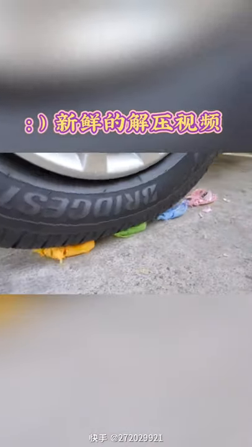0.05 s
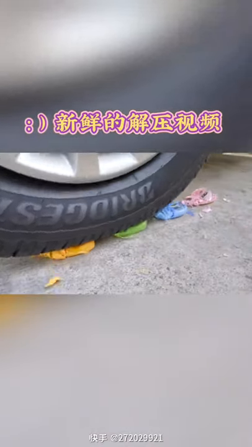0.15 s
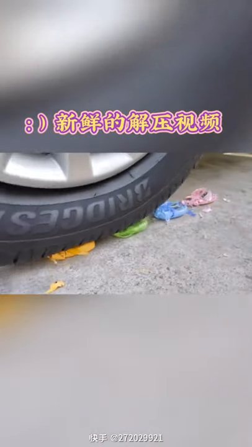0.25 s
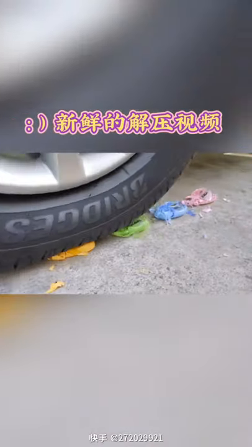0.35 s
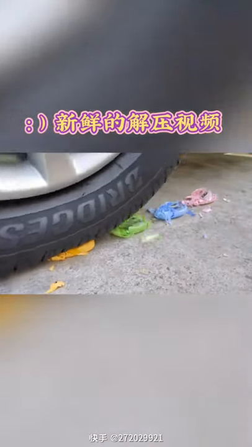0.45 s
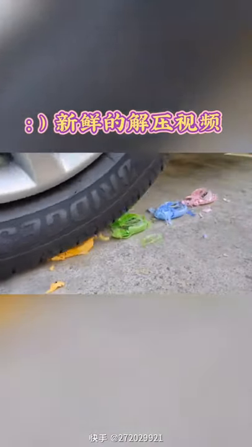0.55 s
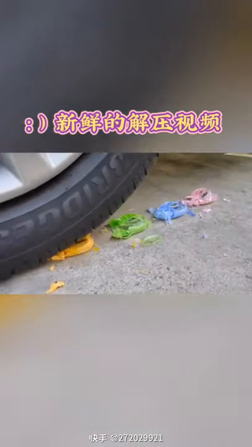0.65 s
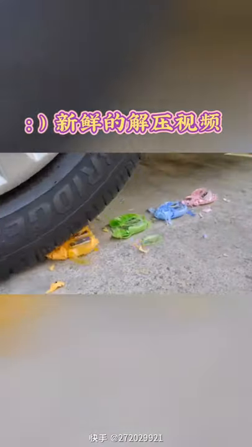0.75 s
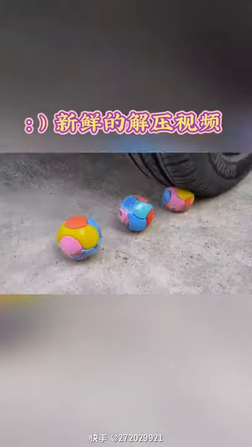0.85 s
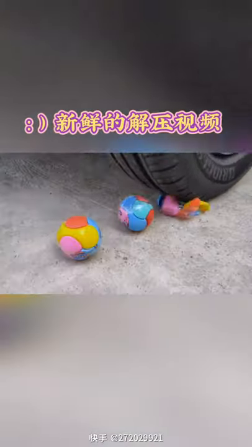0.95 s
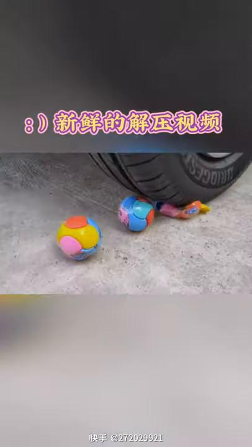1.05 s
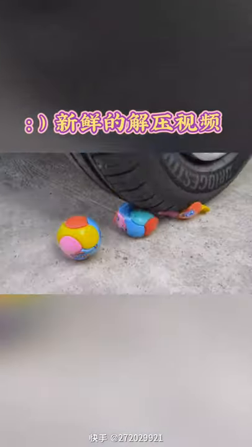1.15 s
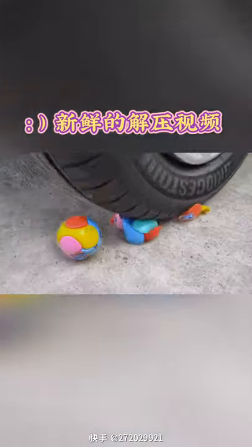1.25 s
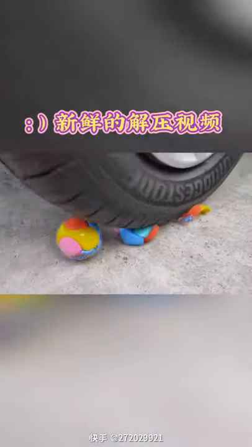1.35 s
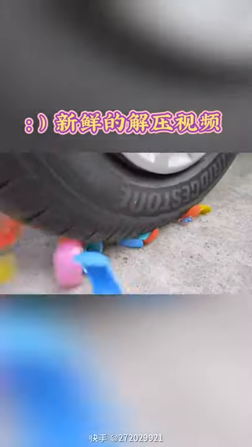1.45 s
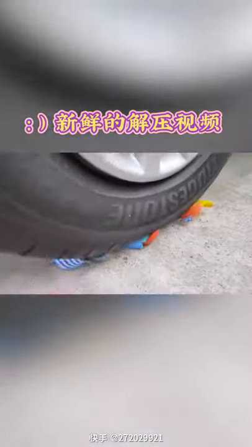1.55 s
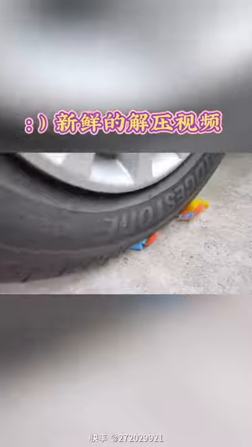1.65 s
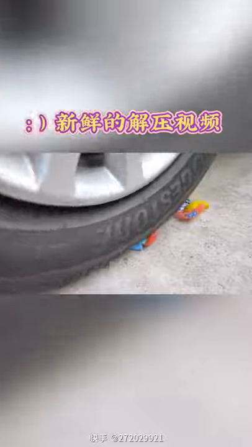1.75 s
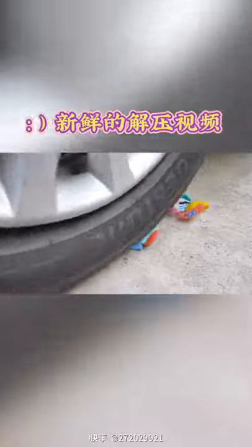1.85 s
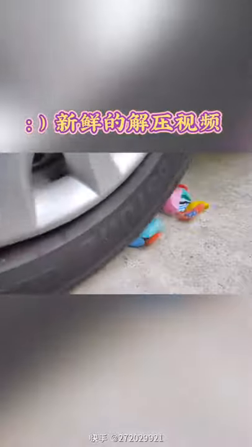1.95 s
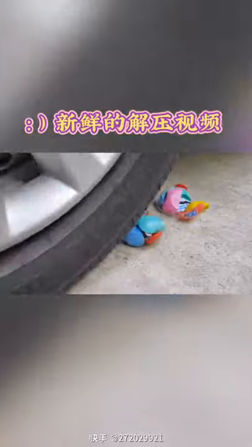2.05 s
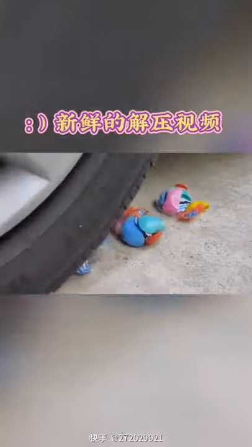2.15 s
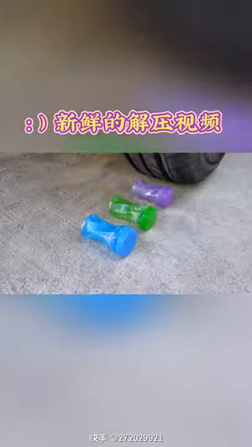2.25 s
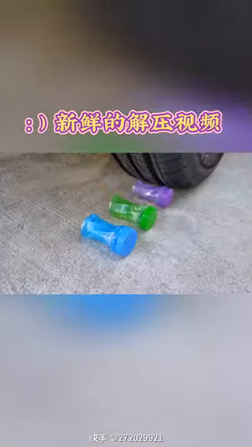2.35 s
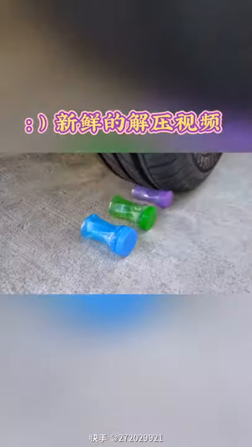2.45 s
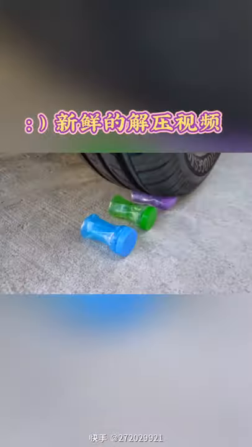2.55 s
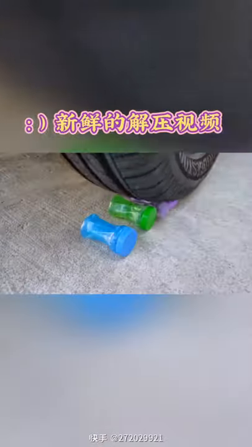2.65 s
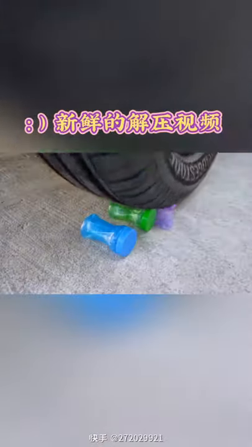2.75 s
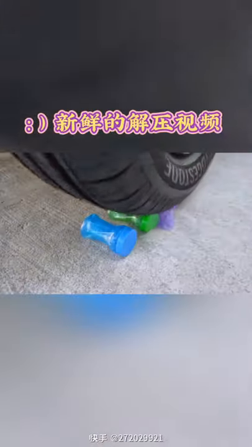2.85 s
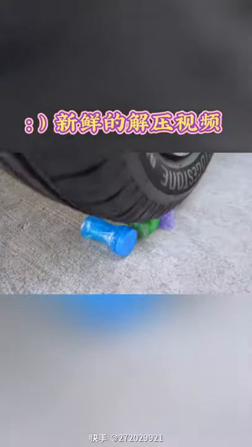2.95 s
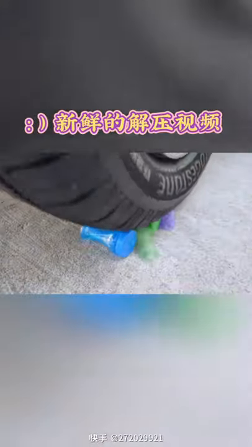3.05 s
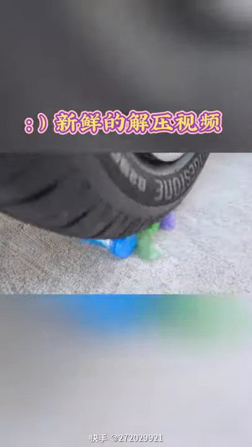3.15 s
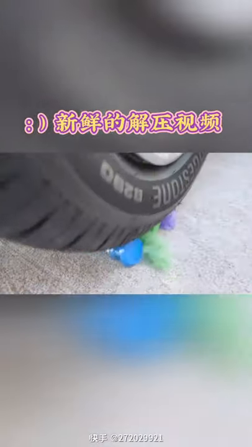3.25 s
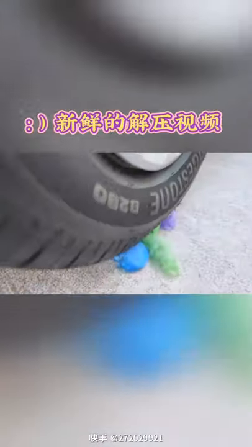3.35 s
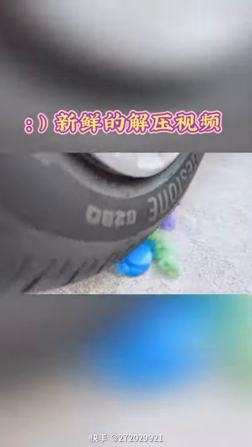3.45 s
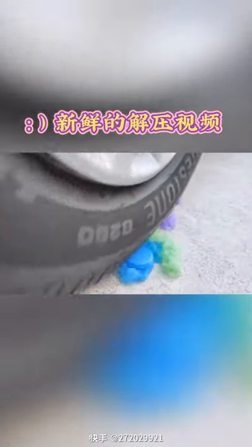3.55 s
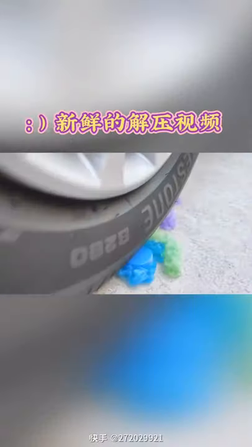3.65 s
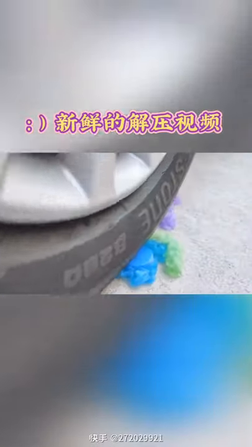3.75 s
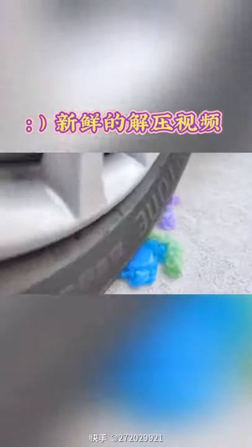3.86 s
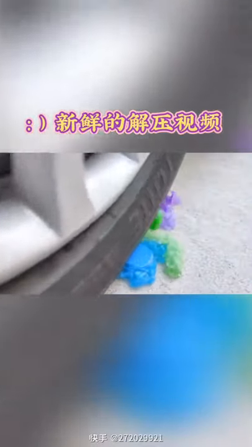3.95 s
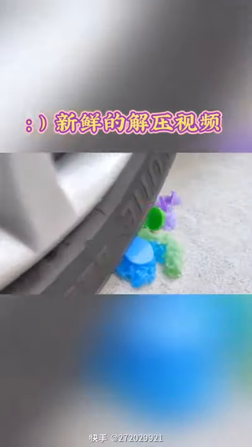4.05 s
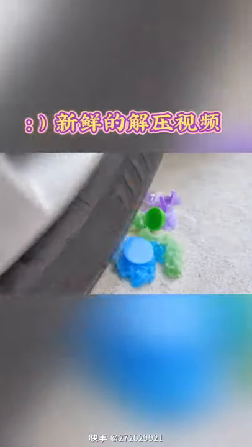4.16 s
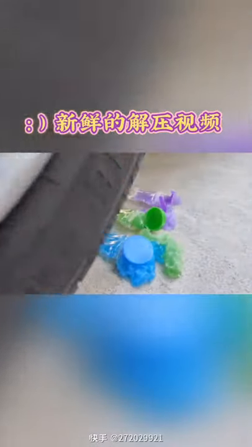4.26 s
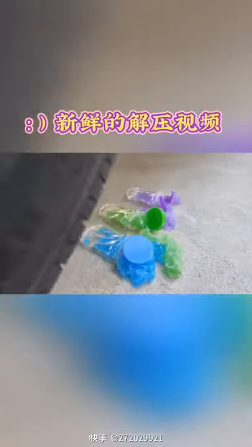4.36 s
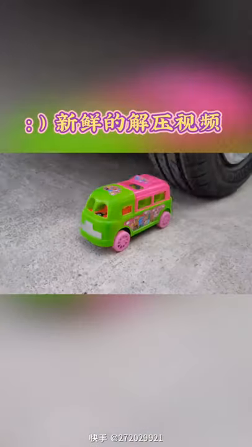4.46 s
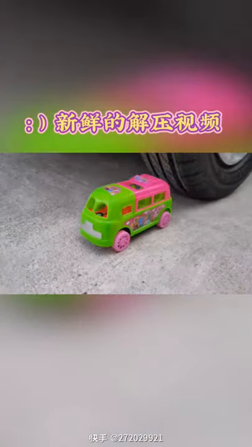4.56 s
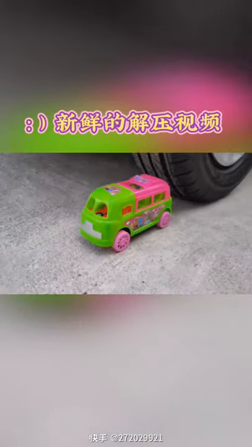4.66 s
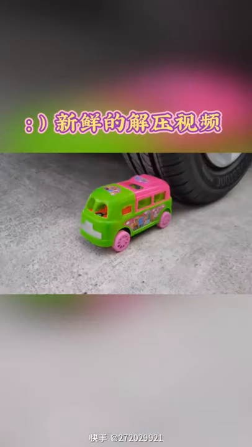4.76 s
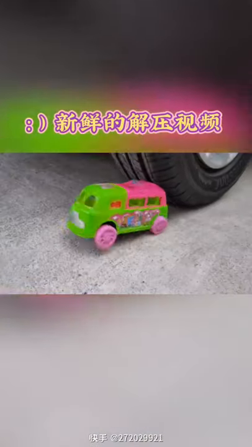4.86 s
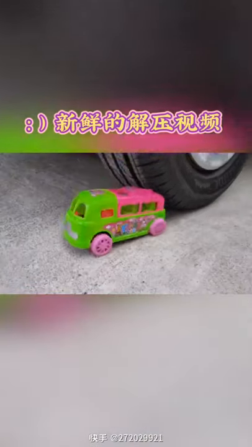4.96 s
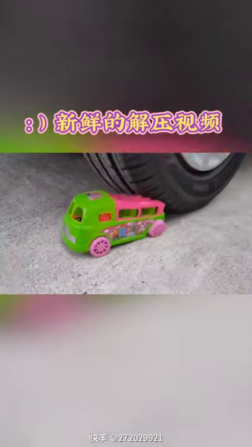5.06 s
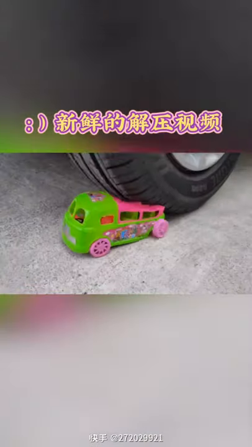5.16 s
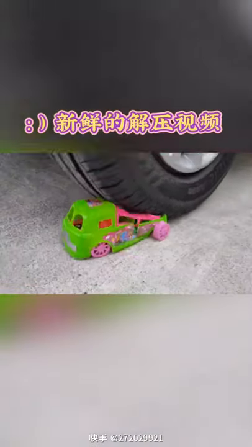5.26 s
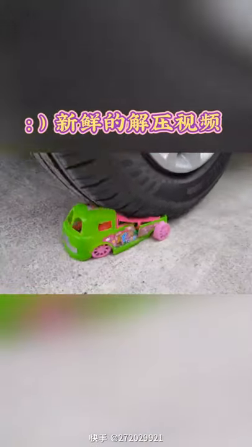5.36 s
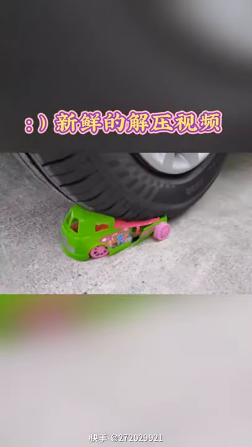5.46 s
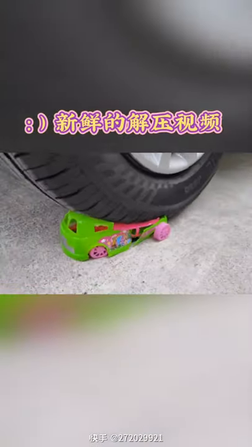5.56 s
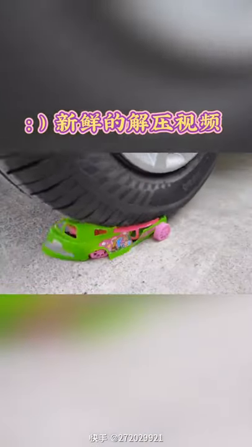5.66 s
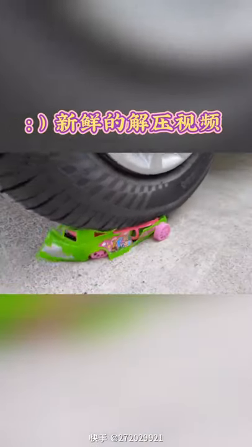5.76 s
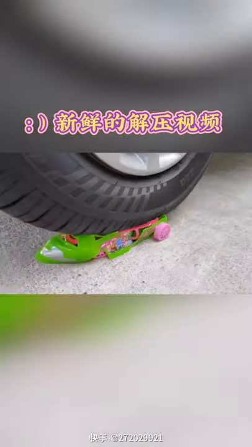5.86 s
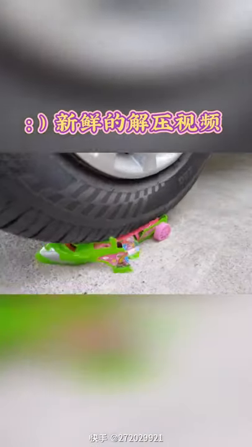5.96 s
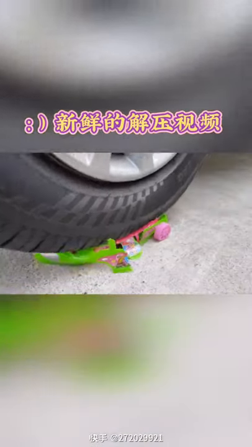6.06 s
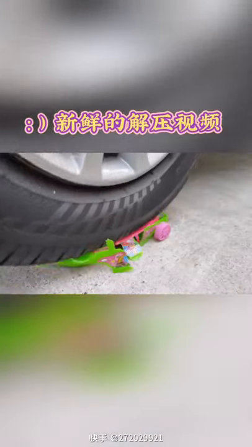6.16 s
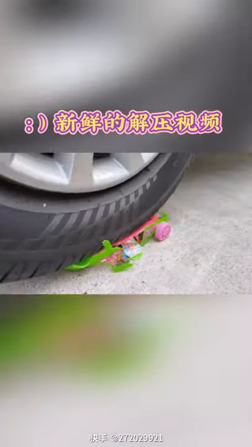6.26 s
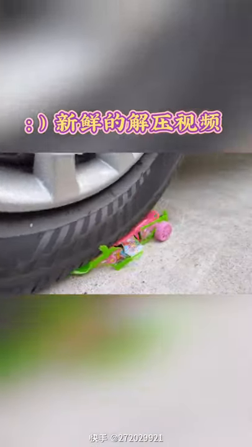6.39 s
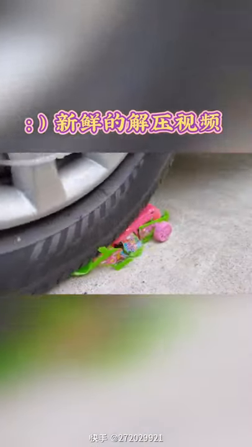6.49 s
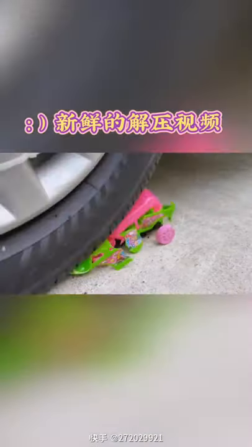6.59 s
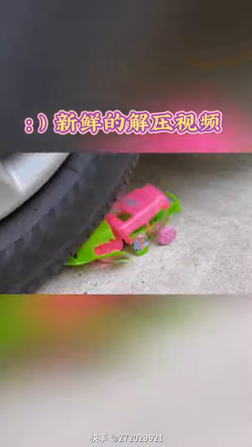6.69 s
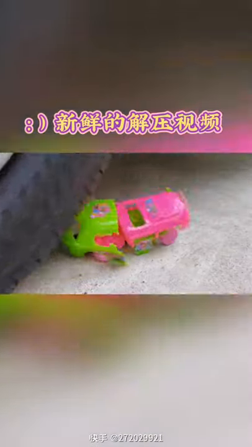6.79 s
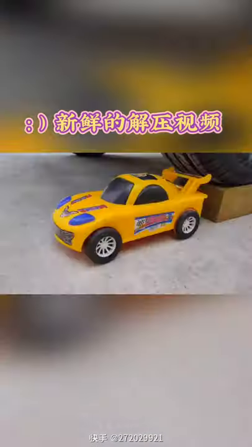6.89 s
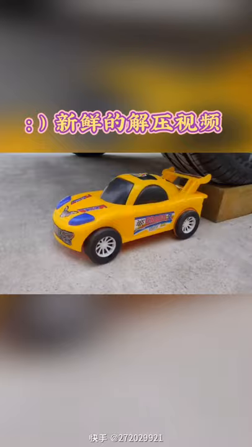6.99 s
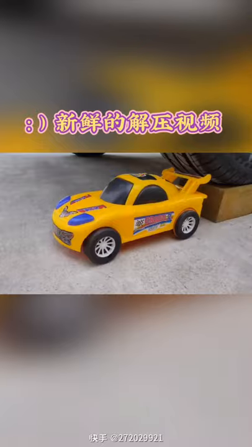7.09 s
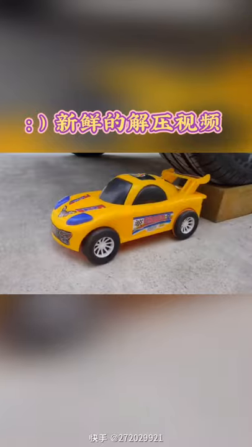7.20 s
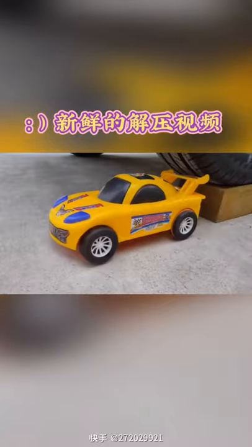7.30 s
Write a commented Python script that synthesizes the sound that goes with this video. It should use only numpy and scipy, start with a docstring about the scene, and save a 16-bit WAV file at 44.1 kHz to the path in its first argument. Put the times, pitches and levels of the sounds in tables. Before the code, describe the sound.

Close outdoor stereo sound of a car wheel crushing plastic toys on concrete. Dull tread knocks and gritty crunching open on small toy cars, then hollow balls crack and pop more brightly. Plastic cups follow with sparse snaps and soft denting, and finally a toy bus breaks in dense cracks and loud hollow pops. Splinters grind throughout, with faint low rumble and a very short tail.

```python
"""Knocks of tread on concrete and grinding splinters come first, as a car tyre rolls slowly over plastic toys.
Small cars, hollow balls, cups and then a toy bus give way: each shell splits in a run of tiny fractures,
kicks the tyre and rings briefly. Lighter, brighter cracks fall between, and buckling walls pop hollowly.
Splinters grind under the tread as the load on each toy builds and fades, and flare up after every heavy crack.
The tyre hums at times, the car rumbles low beneath it all, and its body and the yard add a short tail."""
import sys
import numpy as np
from scipy import signal
from scipy.fft import rfft, irfft
from scipy.io import wavfile
from scipy.ndimage import uniform_filter1d

SR = 44100
rng = np.random.default_rng(int(sys.argv[2]) if len(sys.argv) > 2 else 0)


def transcribe(signal):
    """Save signal, clipped to [-1, 1], as a 16-bit WAV file at the path in sys.argv[1]."""
    frames = np.atleast_2d(signal).T
    limited = np.clip(frames, -1, 1)
    pcm = np.round(limited * 32767).astype(np.int16)
    wavfile.write(sys.argv[1], SR, pcm)


N = 323253  # length in samples
TAPS = 2048  # samples in a short sound or filter
BALLS_FROM, BALLS_TO = .83, 2.26  # seconds in which the balls lie under the wheel
LEAD_S = .012  # room for a sound to begin before its listed moment


def amp(db):
    """Turns decibels into a factor."""
    return 10 ** (np.asarray(db) / 20)


def unit(x):
    """Scales to energy 1 per channel, on average."""
    energy = np.sum(x ** 2, -1)
    return x / np.sqrt(np.mean(energy) + 1e-20)


def add(mix, s, sound):
    """Mixes a stereo sound in at time s."""
    start = max(round(s * SR), 0)
    part = mix[:, start:][:, :sound.shape[1]]
    part += sound[:, :part.shape[1]]


def convolve(x, response):
    """Causal filtering that keeps the length."""
    full = signal.fftconvolve(np.atleast_2d(x), np.atleast_2d(response), axes=1)
    return full[:, :x.shape[-1]]


def noise(n, same):
    """Random pressure at two microphones that share a part of it: same is the shared part of the power."""
    draws = rng.standard_normal((3, n))
    return np.sqrt(same) * draws[0] + np.sqrt(1 - same) * draws[1:]


def under_balls(s):
    """True while the balls lie under the wheel."""
    return (s > BALLS_FROM) & (s < BALLS_TO)


# The moments when a shell splits.
# Each row: time in seconds, bright snap in dB, shell body in dB, thump in dB,
# and roughly how long the split runs in seconds.
CRACKS = [ (0.1938, -26, -29.5, -25.5, 0.0023), (0.209, -24.5, -38.5, -19.5, 0.0086),
          (0.256, -26, -27, -19, 0.0089), (0.3767, -23.5, -38, -24, 0.0071),
          (1.055, -16, -16.5, -23, 0.0058), (1.1243, -18.5, -20.5, -22.5, 0.0096),
          (1.298, -24, -19, -28, 0.0012), (1.3156, -20, -22, -25, 0.0027),
          (1.381, -17.5, -21, -27.5, 0.0069), (1.4938, -22, -24.5, -20.5, 0.005),
          (1.5597, -22, -23.5, -23.5, 0.0041), (1.605, -19.5, -21.5, -22.5, 0.0097),
          (2.1875, -24.5, -29, -58, 0.016), (2.6802, -22, -24.5, -24.5, 0.0009),
          (2.705, -17.5, -23.5, -23, 0.0025), (3.0314, -20, -24.5, -29.5, 0.0016),
          (3.442, -16, -18, -15.5, 0.0022), (3.5572, -22.5, -26, -20.5, 0.0017),
          (3.9403, -41, -28.5, -31.5, 0.0021), (5.045, -19, -16, -46, 0.0014),
          (5.057, -21.5, -22, -22, 0.0052), (5.147, -18.5, -25, -17.5, 0.0073),
          (5.1855, -19, -23, -21, 0.0036), (5.228, -20, -23, -18.5, 0.0097),
          (5.341, -16, -27.5, -24, 0.00061), (5.347, -17.5, -24.5, -21, 0.0071),
          (5.4369, -15, -18.5, -18.5, 0.015), (5.523, -22, -36, -25.5, 0.0016),
          (5.5876, -19, -21.5, -21, 0.0053), (5.7155, -24.5, -26, -21.5, 0.0044),
          (5.8579, -16, -21, -14.5, 0.0091), (6.1244, -17, -19, -18, 0.0048),
          (6.2985, -29.5, -25.5, -28, 0.0015), (6.4464, -34, -30, -29, 0.0073),
          (6.4879, -16, -19.5, -27.5, 0.0022), (6.5175, -27, -29.5, -23, 0.0043),
          (6.557, -20, -32, -29, 0.0015), (6.8893, -26, -26.5, -39, 0.0081)]


def cracks(thin, ball):
    """Every shell splits in the colour of the toy under the wheel, and kicks the tyre."""
    out = np.zeros((2, N))
    for s, snap, body, thump, run in CRACKS:
        colour = ball if under_balls(s) else thin
        add(out, s - LEAD_S, crack((snap, body, thump), run, colour))
        add(out, s, tyre(thump))
    return out


def crack(levels_db, run, colour, first_db=2, tail_db=-13, tail_s=0.013, slips_per_s=2200, tear=0.28,
          same=0.37, strain_db=-12, strain_s=0.005, lag_s=.00014):
    """Strained fibres tick, one sharp break follows, smaller ones run along the split, splinters rustle away."""
    t = np.arange(2 * TAPS) / SR - LEAD_S
    after = np.maximum(t, 0)
    # scattered strong slips over a weaker, steady tearing
    slips = noise(len(t), same) * (tear + (rng.random(len(t)) < slips_per_s / SR))
    running = unit(slips * (t > 0) * np.exp(-(after / (1.3 * run)) ** 2))
    straining = unit(slips * (t < 0) * np.exp(-abs(t) / strain_s))
    first = unit(noise(len(t), same) * np.exp(-abs(t) / 0.00023))
    rustle = unit(noise(len(t), 0) * (t > 0) * np.exp(-after / tail_s))
    # a quick split puts most of its force into the first break
    first_gain = amp(first_db) * np.exp(-run / .006)
    force = running + amp(strain_db) * straining + first_gain * first + amp(tail_db) * rustle
    force = convolve(force, shard(t - t[0]))
    left, right = sum(amp(db) * unit(convolve(force, r)) for db, r in zip(levels_db, colour))
    # the toys lie off to one side, so the sound reaches the left microphone up to lag_s later
    left = np.roll(left, int(rng.random() * lag_s * SR))
    # each part's energy is set as if spread evenly over 10 ms
    return np.array([left, right]) * np.sqrt(SR / 100)


def shard(t, low_hz=900, high_hz=7500, cycles=14, ring_db=-3, count=12):
    """A piece of plastic passes the blow on and rings in a few modes set by its chance size."""
    hz = rng.uniform(low_hz, high_hz, (count, 1))
    fade = np.exp(-t * hz / cycles)
    modes = fade * np.cos(2 * np.pi * hz * t) * 2 * hz / cycles / SR
    strengths = amp(ring_db) * 2 * rng.uniform(0, 2.48, (2, count))
    blow = t == 0
    return blow + strengths @ modes


# The colour of the thin brittle toys, and below it that of the tougher balls.
# Each row: frequency in Hz, relative strength in dB per Hz.
THIN = [(25, -14), (60, -9.5), (110, 3.5), (200, 0), (450, -3), (800, 0.5), (1500, -9), (3600, -10.5),
        (5000, -5.5), (6500, 3), (7600, -6), (9000, -10), (15500, -48.5)]
BALL = [(30, -6), (100, 7.5), (220, 0.5), (700, 2), (2000, 4.5), (3200, -3.5), (4200, -11.5), (6400, -2),
        (8000, -9.5), (9800, -20.5), (13000, -16), (16000, -31)]
SPLIT_HZ = (550, 3000)  # borders between low, middle and high parts


def registers(colour):
    """Filters for the high, middle and low parts of a colour, which respond only after the blow."""
    hz = np.fft.rfftfreq(TAPS, 1 / SR) + 1
    f, db = np.transpose(colour)
    gain = amp(np.interp(np.log(hz), np.log(f), db))
    low, below = (1 / (1 + (hz / edge) ** 8) for edge in SPLIT_HZ)
    shares = np.array([1 - below, below * (1 - low), low])
    log_gain = np.log(np.maximum(gain * np.sqrt(shares), 1e-5))
    # the Hilbert transform of the log gain gives the phase that packs the energy at the start
    circle = np.concatenate([log_gain, log_gain[:, -2:0:-1]], 1)
    responses = np.fft.ifft(np.exp(np.conj(signal.hilbert(circle)))).real
    return [unit(r) for r in responses]


# The ring of the struck tyre, its tread and air cavity.
# Each row: pitch in Hz, relative level in dB, time to fade by 60 dB in seconds.
TYRE = [(102.4, 0.5, 0.6), (237.4, -12.5, 0.24)]


def tyre(thump_db, ring_db=-20, swell_s=0.003):
    """The struck tread and air cavity ring in fading tones, out of step at the two microphones."""
    t = np.arange(SR // 2) / SR
    hz, db, t60 = np.transpose(TYRE)[:, :, None]
    turns = hz * t + rng.random((2, len(TYRE), 1))
    modes = amp(db - 60 * t / t60) * np.sin(2 * np.pi * turns)
    return amp(thump_db + ring_db) * (1 - np.exp(-t / swell_s)) * modes.sum(1)


# Lighter, brighter cracks of the shells, with little thump.
# Each row: time in seconds, level of the bright part in dB.
LIGHT_CRACKS = [(0.089, -27), (0.156, -29), (0.37, -31), (0.4507, -23), (0.4725, -41), (0.502, -30.5),
                (0.6022, -30.5), (0.6434, -32), (0.674, -21), (0.727, -33.5), (0.7382, -27), (0.765, -37),
                (0.919, -32.5), (1.1596, -34), (1.2054, -30.5), (1.233, -30), (1.3524, -23.5),
                (1.47, -26.5), (1.7738, -27), (1.8398, -22.5), (1.85, -26), (1.871, -32.5), (1.9357, -29),
                (2.012, -28.5), (2.0773, -24), (2.125, -28), (2.7512, -32.5), (2.924, -17), (3.1437, -38),
                (3.244, -38), (3.2888, -21.5), (3.3636, -35), (3.5285, -31), (3.6652, -30.5),
                (3.7594, -31.5), (3.8309, -28.5), (3.9952, -35), (4.406, -53), (5.117, -32.5), (5.208, -22),
                (5.242, -22), (5.403, -27), (5.5733, -28.5), (5.67, -34.5), (5.683, -30.5), (5.892, -27.5),
                (6.055, -31), (6.0658, -26.5), (6.098, -22.5), (6.2182, -23.5), (6.274, -27), (6.328, -25),
                (6.3538, -26.5), (6.432, -35.5), (6.4776, -27), (6.576, -25), (6.6906, -28),
                (6.7509, -20.5), (6.767, -24.5), (6.8431, -25.5)]
# shell body on thin toys and on balls, and thump, in dB relative to the bright part; rough time it runs in s
LIGHT_THIN_DB, LIGHT_BALL_DB, LIGHT_THUMP_DB, LIGHT_RUN_S = -9.5, -3.5, -17, 0.0022


def light_cracks(thin, ball):
    """The shells crack lightly and brightly, by the same fractures, with little thump and no ring of the tyre."""
    out = np.zeros((2, N))
    for s, db in LIGHT_CRACKS:
        colour, body_db = (ball, LIGHT_BALL_DB) if under_balls(s) else (thin, LIGHT_THIN_DB)
        levels_db = (db, db + body_db, db + LIGHT_THUMP_DB)
        add(out, s - LEAD_S, crack(levels_db, LIGHT_RUN_S, colour))
    return out


# Walls that buckle with a hollow pop.
# Each row: time in seconds, level in dB, pitch in Hz.
POPS = [(0.965, -14.5, 870), (1.254, -18.5, 910), (1.4434, -9, 1670), (1.7207, -19, 910),
        (1.8205, -14, 1060), (2.61, -28.5, 1030), (2.883, -25, 460), (3.244, -26, 930),
        (3.5549, -11.5, 726), (4.606, -28, 570), (4.616, -27, 320), (5.059, -5.5, 1720),
        (5.117, -19.5, 920), (5.403, -15, 850), (5.5236, -11.5, 680), (5.684, -14.5, 874),
        (5.7534, -9.5, 847), (5.82, -8.5, 890), (5.993, -21, 804), (6.041, -21, 895), (6.2974, -17, 648),
        (6.5191, -17, 620)]


def pops(thin, cycles=1.28, echo_s=0.023, echo_db=-16, tick_db=-5, skew_rad=0.4, rustle_db=-14,
         rustle_s=0.008):
    """A wall snaps through: a few cycles of the hollow shell, a faint tick, a rustle and an echo off the wheel."""
    out, t = np.zeros((2, N)), np.arange(TAPS) / SR
    tick_filter = thin[0] + thin[1] / 2
    for s, db, hz in POPS + dents():
        age = t * hz / cycles
        swell = (1 - np.exp(-2 * age)) ** 2 * np.exp(-age)
        skew = skew_rad * rng.standard_normal((2, 1))
        knock = swell / swell.max() * np.sin(2 * np.pi * hz * t + skew)
        force = noise(len(t), 0.67) * (np.exp(-age / 2) + amp(rustle_db) * np.exp(-t / rustle_s))
        # small stiff walls tick, large soft ones only thud
        tick = min(hz / 850, 1) ** 4 * unit(convolve(force, tick_filter))
        pop = amp(db) * (knock + amp(tick_db) * tick)
        add(out, s, pop)
        add(out, s + echo_s, amp(echo_db) * pop)
    return out


# Balls and cups also give in many small dents.
# Each row: start in seconds, end in seconds, middle level in dB, lowest and highest pitch in Hz.
DENTS = [(0.948, 1.521, -27, 858, 2430), (2.76, 3.621, -33.5, 276, 1100)]


def dents(count=48, spread_db=1.5):
    """Small soft pops at chance moments, listed as (time in s, level in dB, pitch in Hz)."""
    rows = []
    for start, end, db, low, high in DENTS:
        for when, size, pitch in rng.random((count, 3)):
            s = start + (end - start) * when
            rows.append((s, db + spread_db * (2 * size - 1), low * (high / low) ** pitch))
    return rows


# The tread knocks on the concrete as a shell gives way.
# Each row: time in seconds, level in dB.
KNOCKS = [(0.0201, -8.5), (0.0274, -11.5), (0.0455, -15.5), (0.087, -15.5), (0.1072, -7.5), (0.1127, -11.5),
          (0.125, -11), (0.134, -9.5), (0.1433, -11.5), (0.213, -11), (0.369, -21), (0.3797, -21.5),
          (0.4509, -8), (0.5005, -13), (2.9238, -9), (3.232, -20.5)]


def knocks(push_s=0.00064, recoil=4, skew_rad=0.83, tyre_db=-16):
    """A single slap of rubber inside a slower, opposite flexing of the tread, that sets the tyre ringing."""
    out = np.zeros((2, N))
    u = (np.arange(TAPS) / SR - LEAD_S) / push_s
    push = signal.hilbert(np.exp(-(u / recoil) ** 2) / recoil - np.exp(-u ** 2))
    for s, db in KNOCKS:
        # a chance turn of phase at each microphone
        turn = np.exp(1j * skew_rad * rng.standard_normal((2, 1)))
        add(out, s - LEAD_S, amp(db) * (push * turn).real / abs(push).max())
        add(out, s, tyre(db + tyre_db))
    return out


def grinding(thin, ball, spread_db=0.4):
    """Splinters break under the tread; the heavy wheel rumbles below them."""
    t = np.arange(N) / SR
    fizz, crunch, rumble = grinding_levels()
    # with little left to break, the smooth scrape of rubber on concrete dominates
    scrape = .3 + .0015 / fizz
    # the harder the tyre grinds, the more breaks a second
    breaks_per_s = 350 + 70000 * fizz
    grit = grains(breaks_per_s, spread_db, scrape)
    roll = grains(per_s=130, spread_db=0.0, bed=0.41, clump_db=-1, patchy_db=0)
    drives = (grit * fizz, grit * crunch, roll * rumble)
    on_ball = under_balls(t)
    out = np.zeros((2, N))
    for drive, thin_part, ball_part in zip(drives, thin, ball):
        out += convolve(drive * ~on_ball, thin_part) + convolve(drive * on_ball, ball_part)
    return out


def grains(per_s, spread_db, bed, same=0.45, clump_db=3, patchy_db=5.5):
    """Clumps of tiny breaks of uneven size over a smooth bed of scraping, with power held near 1."""
    t = np.arange(N) / SR
    knots = np.arange(0, t[-1] + 1, .006)
    clumps_db = clump_db * np.interp(t, knots, rng.standard_normal(len(knots)))
    sizes_db = spread_db * np.minimum(rng.exponential(1, N), 3.5)
    breaks = amp(clumps_db + sizes_db) * (rng.random(N) < per_s / SR)
    grit = unit(patchy(noise(N, same) * breaks / np.sqrt(per_s), patchy_db))
    x = grit + bed * unit(noise(N, same / 2))
    return x / np.sqrt(uniform_filter1d((x ** 2).mean(0), size=2 * TAPS))


def patchy(x, patchy_db):
    """Random patches of time and pitch make the grinding's colour uneven."""
    z = signal.stft(x, nperseg=512)[2]
    patches = uniform_filter1d(rng.standard_normal(z.shape[1:]), size=4, axis=0)
    patches = uniform_filter1d(patches, size=5, axis=1)
    gain = amp(patchy_db * patches / patches.std())
    gain = gain / np.sqrt(np.mean(gain ** 2))
    return signal.istft(z * gain, nperseg=512)[1][:, :N]


# One pass of the wheel over each kind of toy: small cars, balls, cups, bus.
# Each row: first touch, full load and roll-off in seconds; rise, fade and release in dB per second;
# fizz, crunch and rumble in dB before the slopes lower them.
PASSES = [(0.0, 0.104, 1.08, 21.5, 24, 399, -35.5, -44, -42),
          (0.91, 1.4, 2.33, 8, 9.5, 706, -33.5, -37, -43.5),
          (2.58, 2.899, 4.48, 27, 8.5, 43.5, -56, -52, -43),
          (4.987, 5.401, 7.12, 8, 4, 150.5, -46.5, -46, -46.5)]
# A wall crumples in a swell of tiny breaks.
# Each row: middle in seconds, time from there to 6 dB down in seconds, peak fizz, crunch and rumble in dB.
CRUMPLES = [(0.071, 0.1, -26, -27.5, -27.5), (1.418, 0.095, -29, -25.5, -51.5),
            (1.854, 0.061, -27.5, -31, -37.5), (2.952, 0.024, -31, -30, -43), (3.049, 0.013, -31, -36, -38),
            (3.981, 0.023, -37.5, -36, -46), (4.134, 0.032, -42.5, -36, -40.5),
            (5.481, 0.076, -36, -33, -34)]
CONTACT_DB_PER_S = 605.5  # how fast grinding swells up to the first touch
# splinters shed by a heavy crack: fizz, crunch and rumble relative to its three levels, then rise and fall
SPLINTERS_DB, SPLINTERS_BUILD_DB_PER_S, SPLINTERS_FADE_DB_PER_S = (-20, -17.5, -22.5), 1506, 191.5


def grinding_levels():
    """Gains of fizz, crunch and rumble: the load on each toy, crumpling walls and splinters add in power."""
    t = np.arange(0, N / SR, .002)
    parts = []
    for touch, full, off, rise, fade, release, *levels_db in PASSES:
        load = ramp(t, full, rise, fade) + ramp(t, touch, CONTACT_DB_PER_S, 0) + ramp(t, off, 0, release)
        parts.append((levels_db, load))
    for s, half, *levels_db in CRUMPLES:
        parts.append((levels_db, -6 * ((t - s) / half) ** 2))
    for s, *levels_db, _ in CRACKS:
        flare = ramp(t, s, SPLINTERS_BUILD_DB_PER_S, SPLINTERS_FADE_DB_PER_S)
        parts.append((np.add(levels_db, SPLINTERS_DB), flare))
    power = sum(np.outer(amp(levels_db), amp(shape_db)) ** 2 for levels_db, shape_db in parts)
    return [np.interp(np.arange(N) / SR, t, np.sqrt(p + 1e-12) * dips(t)) for p in power]


def ramp(t, s, before_db_per_s, after_db_per_s):
    """Level in dB that climbs to 0 at time s and falls again."""
    return -before_db_per_s * np.maximum(s - t, 0) - after_db_per_s * np.maximum(t - s, 0)


# The level of the grinding and the car's rumble dips briefly.
# Each row: middle in seconds, half length in seconds, depth in dB.
DIPS = [(0.809, 0.027, -30.5), (2.258, 0.051, -29.5)]


def dips(t):
    """Gain that falls smoothly and recovers at each brief dip in level."""
    return amp(sum(db * np.exp(-((t - s) / half) ** 2) for s, half, db in DIPS))


# The loaded tyre hums as it scrubs over flattened plastic.
# Each row: start in seconds, end in seconds, level in dB, pitch in Hz.
HUMS = [(1.547, 1.946, -48, 241), (5.429, 5.808, -41.5, 97.8), (5.601, 6.468, -48, 244.7)]


def wheel(waver=0.0043):
    """Scrubbing keeps the tread and the air cavity of the tyre sounding on a slightly unsteady pitch."""
    out = np.zeros((2, N))
    for start, end, db, hz in HUMS:
        t = np.arange(0, end - start, 1 / SR)
        drift = np.interp(t, np.linspace(0, t[-1], 10), rng.standard_normal(10))
        turns = np.cumsum(hz * (1 + waver * drift)) / SR + rng.random((2, 1)) / 2
        tone = np.sqrt(2) * np.sin(2 * np.pi * turns)
        add(out, start, amp(db) * tone * signal.windows.tukey(len(t), .5))
    return out


# The colour of the car creeping over bare concrete.
# Each row: frequency in Hz, relative strength in dB per Hz.
ROLLING = [(30, -21), (60, -10.5), (105, 8), (170, 5), (450, -11.5), (720, -18.5), (1000, -36),
           (7000, -50.5), (9000, -59.5)]


def rolling(same=0.4, level_db=-50):
    """The low rumble of the creeping car: shaped noise, steady apart from the brief dips in level."""
    hz = np.fft.rfftfreq(N, 1 / SR) + 1
    f, db = np.transpose(ROLLING)
    gain = amp(np.interp(np.log(hz), np.log(f), db))
    rumble = irfft(rfft(noise(N, same)) * gain, N)
    return amp(level_db) * unit(rumble) * np.sqrt(N) * dips(np.arange(N) / SR)


def yard(x, t60=0.086, delay_s=0.0048):
    """Sparse, fading echoes from the underside of the car and nearby walls."""
    t = np.arange(SR // 3) / SR
    echoes = rng.standard_normal((2, len(t))) * (rng.random((2, len(t))) < 2000 / SR)
    return convolve(x, unit(echoes * amp(-60 * t / t60) * (t > delay_s)))


def scene(wet_db=-15, right_db=1.0):
    """Hits with their short tail, over grinding, rumble and hums; the right side is a little louder."""
    thin, ball = registers(THIN), registers(BALL)
    hits = cracks(thin, ball) + light_cracks(thin, ball) + pops(thin) + knocks()
    tail = amp(wet_db) * yard(hits)
    mix = hits + tail + grinding(thin, ball) + rolling() + wheel()
    return mix * amp([[0], [right_db]])


def record(dry, leak_db=-26, dull_hz=7900, edge_hz=15850):
    """Peaks are rounded off; only the balls keep full treble above dull_hz; nearly all above edge_hz goes."""
    limited = dry / (1 + (dry / .78) ** 6) ** (1 / 6)
    dull = signal.oaconvolve(limited, signal.firwin(127, dull_hz, fs=SR)[None], "same")
    treble = limited - dull
    t = np.arange(N) / SR
    heard = dull + treble * np.where(under_balls(t), 1, amp(leak_db))
    band = signal.firwin(511, edge_hz, window=("kaiser", 9), fs=SR)
    return signal.oaconvolve(heard, band[None], "same")


dry = scene()
out = record(dry)
transcribe(out)
```